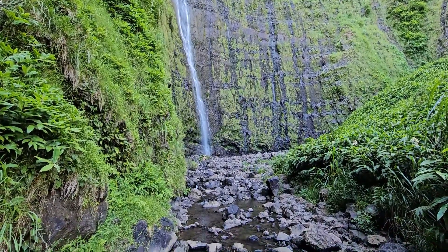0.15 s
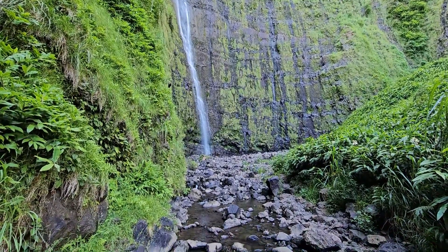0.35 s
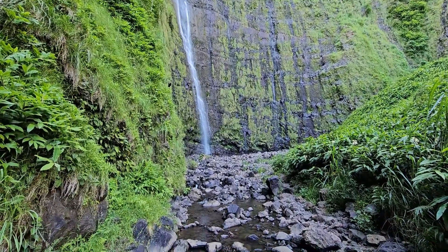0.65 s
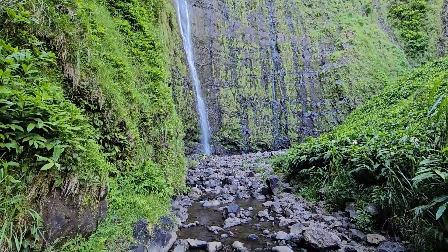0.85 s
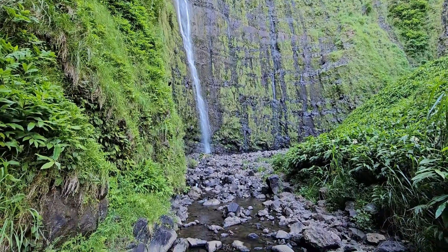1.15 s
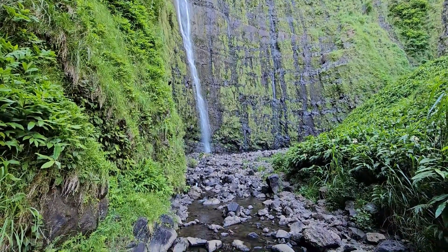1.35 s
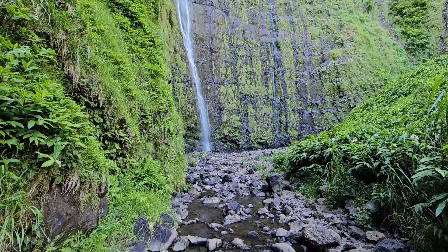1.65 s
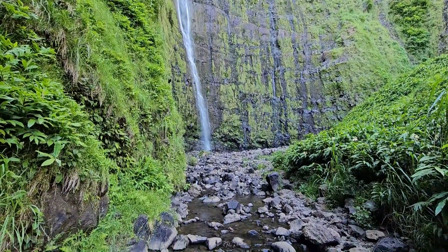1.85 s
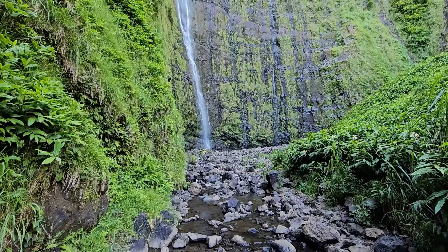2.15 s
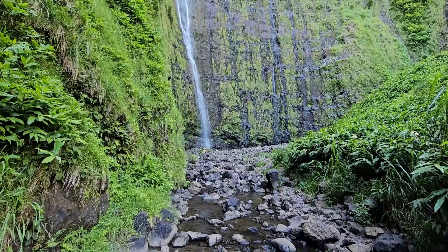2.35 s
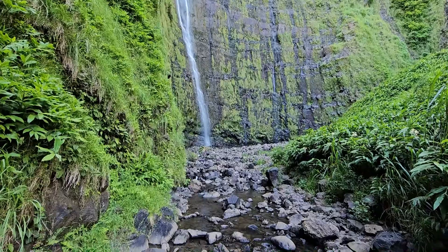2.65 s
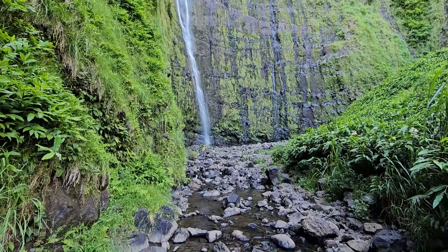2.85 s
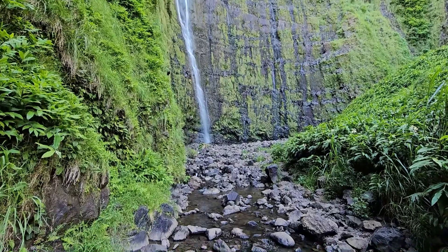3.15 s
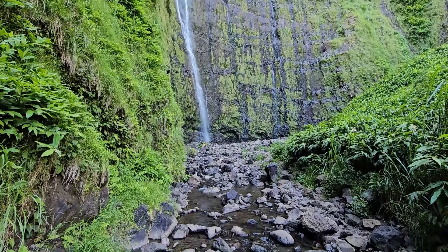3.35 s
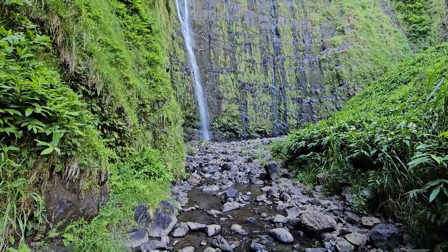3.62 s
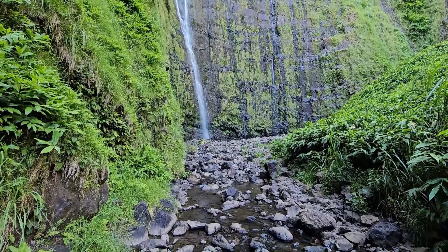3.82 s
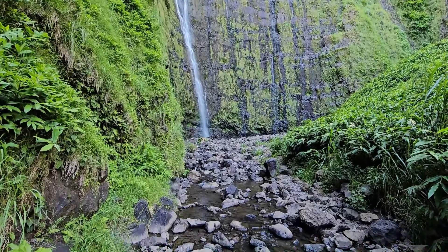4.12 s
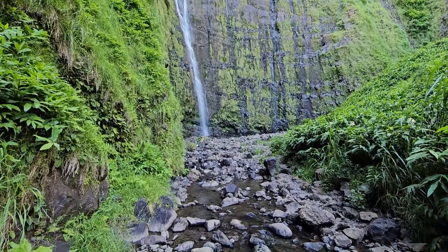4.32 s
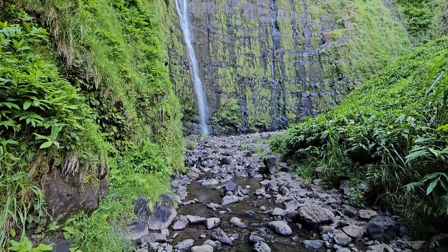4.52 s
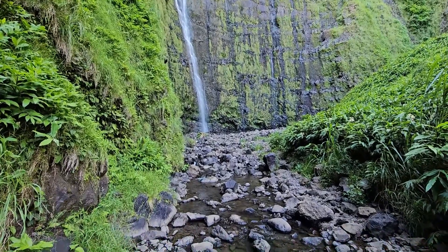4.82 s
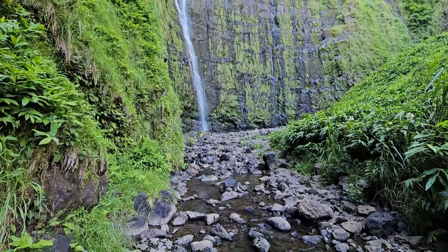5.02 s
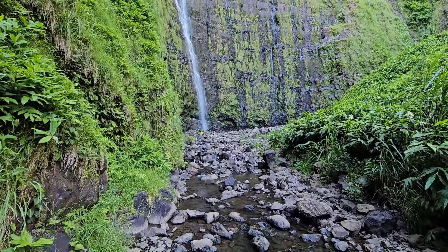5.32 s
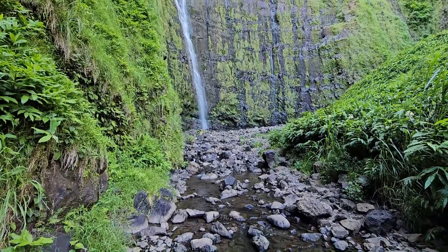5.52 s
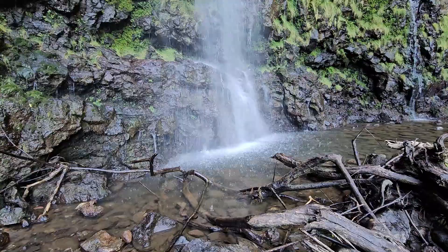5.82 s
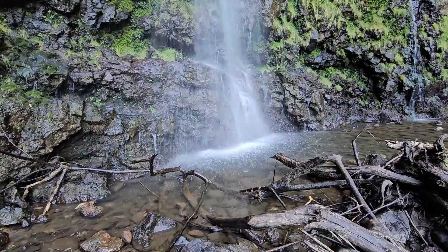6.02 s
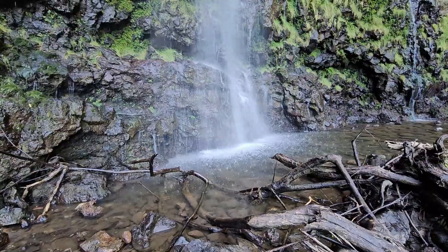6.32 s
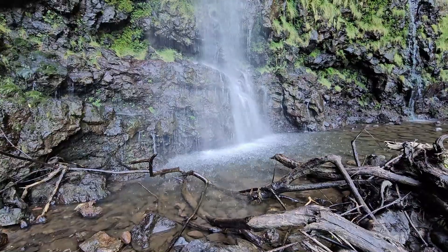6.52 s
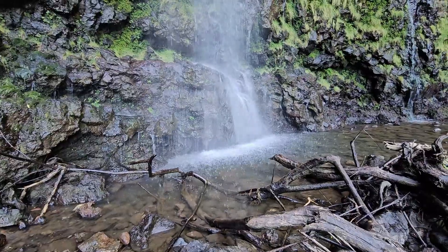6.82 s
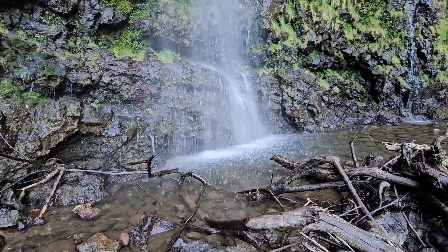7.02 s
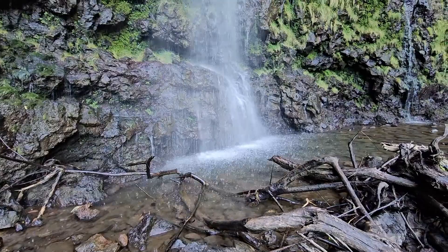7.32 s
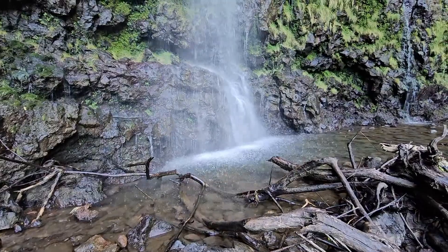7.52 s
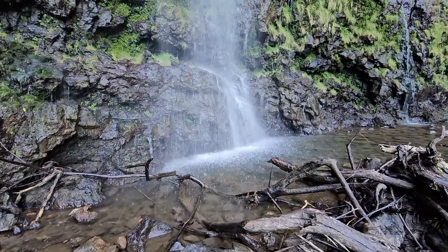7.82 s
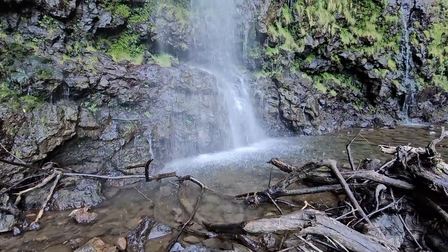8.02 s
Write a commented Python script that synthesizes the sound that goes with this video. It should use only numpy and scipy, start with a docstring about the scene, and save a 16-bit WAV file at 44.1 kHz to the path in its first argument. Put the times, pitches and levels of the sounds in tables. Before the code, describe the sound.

Two stereo views of falling water joined by a hard cut. The first is soft and midrange, a distant wash with fine splashes and small ringing bubbles close by, some low gulps, some high plinks. After a tiny gap, the second is dense, loud spray hitting a pool, slightly hollow from nearby rock, with deep wind buffeting strongest just after the cut.

```python
"""A tall waterfall in a rocky gorge, heard from two places with a brief silence between them.
First from downstream: a soft rush of filtered noise and tiny splashes, with a brook in front
that babbles and gulps among stones, made of ringing bubbles.
Then beside the plunge pool: a loud hiss of noise and spray drops with a rock echo,
while the fall's draught, low noise in one gust and brief puffs, rumbles on the microphone."""
import sys
import numpy as np
from scipy import signal
from scipy.fft import rfft, irfft
from scipy.io import wavfile

SR = 44100
rng = np.random.default_rng(int(sys.argv[2]) if len(sys.argv) > 2 else 0)


def master(y):
    """Save y as 16-bit WAV."""
    cut = np.clip(np.atleast_2d(y).T, -1, 1)
    pcm = np.round(cut * 32767)  # scale
    wavfile.write(sys.argv[1], SR, pcm.astype(np.int16))


N = 359856
LEAVE_S, ARRIVE_S = 5.726, 5.7945  # the brook ends, the pool begins
TIME = np.arange(N) / SR
FREQ = np.maximum(np.arange(N // 2 + 1) * SR / N, 1)  # in Hz, kept above zero for the logarithms
EARS = np.array([[1], [-1]])  # left, right


def from_db(db):
    """Turn decibels into gain."""
    return 10 ** (np.asarray(db) / 20)


def rms_one(x):
    """Scale to an rms (average strength) of 1."""
    return x / np.sqrt(np.mean(x ** 2) + 1e-20)


def in_time(rows):
    """Draw straight lines between (seconds, value) rows, one value per sample."""
    return np.interp(TIME, *np.transpose(rows))


def gain_at(points, hz=FREQ):
    """Read the gain from a (Hz, dB) table, on a log-frequency axis."""
    at, db = np.transpose(points)
    return from_db(np.interp(np.log(hz), np.log(at), db))


def drift(rate):
    """Slow random wander of rms 1 that changes about rate times a second."""
    spectrum = rfft(rng.standard_normal(N))
    return rms_one(irfft(spectrum / (1 + (FREQ / rate) ** 2), N))


def drops(per_s, spread_db):
    """Tiny impacts of uneven size, coming in flurries; two unrelated rows with a joint rms of 1."""
    flurries = from_db(2.2 * drift(12))
    born = rng.random((2, N)) < per_s * flurries / SR
    sizes = from_db(spread_db * np.minimum(rng.exponential(1, (2, N)), 4))
    signs = rng.choice([-1, 1], (2, N))
    return rms_one(born * sizes * signs)


def spread(pair, colour, width, balance):
    """Turn the spectra of the ears' sum and difference into left and right, with tone and balance."""
    mid, side = pair
    apart = gain_at(width)
    ears = (mid + EARS * side * apart) / np.hypot(1, apart)
    tilt = gain_at(balance) ** (EARS / 2)  # half of the balance to each ear
    return irfft(ears * gain_at(colour) * tilt, N) * np.sqrt(SR / 2)


def churn(water, low_hz, high_hz, depth_db, rate, count):
    """Neighbouring pitch ranges of the water noise swell and fade at random, each on its own."""
    spectrum, out = rfft(water), water
    step = np.log(high_hz / low_hz) / (count - 1)
    for hz in np.geomspace(low_hz, high_hz, count):
        triangle = np.clip(1 - abs(np.log(FREQ / hz)) / step, 0, 1)
        band = irfft(spectrum * triangle, N)
        out = out + band * (from_db(depth_db * drift(rate)) - 1)
    return out


# Tone of the pool's hiss, before spray and flicker. Each row: pitch in Hz, level in dB per Hz.
POOL_TONE = [(50, -84.5), (150, -76.5), (260, -72.5), (360, -77), (730, -65), (1020, -69.5), (1330, -58.5),
             (1630, -63.5), (1930, -59.5), (2750, -66), (5500, -65), (8000, -64.5), (12500, -69.5),
             (15700, -65.5)]
# How wide the pool sounds. Each row: pitch in Hz, difference of the ears against their sum in dB.
POOL_SPREAD = [(250, -16), (450, -6.5), (680, -14), (1020, -4.5), (1270, -6.5), (1950, -4.5), (2800, -0.5),
               (15000, 0.5)]
# Which ear is louder at the pool. Each row: pitch in Hz, left minus right in dB.
POOL_LEAN = [(100, 1), (1000, 1.2), (2000, 0.077), (3500, 3), (5500, 1.5), (7000, 0), (9500, 0),
             (13000, -1.3), (15500, -2)]


def plunge(spray_db=-8.0, flicker_db=0.65, echo_hz=620, echo_share=0.097, dull_hz=2700):
    """Countless drops hit the pool; a reflection off nearby rock adds a hollow comb of peaks."""
    hiss = rng.standard_normal((2, N))
    spray = from_db(spray_db) * drops(per_s=5000, spread_db=1.0)
    mid, side = rfft(hiss + spray)
    delayed = np.exp(-2j * np.pi * FREQ / echo_hz)  # late by 1 / echo_hz, so peaks lie echo_hz apart
    echo = 1 + echo_share * delayed / (1 + (FREQ / dull_hz) ** 6)
    flicker = from_db(flicker_db * drift(15))
    return flicker * spread((mid * echo, side), POOL_TONE, POOL_SPREAD, POOL_LEAN)


# Tone of the rush downstream, before splashes and flicker. Each row: pitch in Hz, level in dB per Hz.
STREAM_TONE = [(25, -105), (90, -90.5), (150, -90), (240, -77), (370, -80.5), (630, -74.5), (1000, -77),
               (2050, -73.5), (2600, -78.5), (3700, -76), (5300, -82), (8000, -79), (10000, -85),
               (15700, -91)]
# How wide the rush sounds. Each row: pitch in Hz, difference of the ears against their sum in dB.
STREAM_SPREAD = [(50, -11), (220, -20), (440, -8.5), (670, -9.5), (1000, -3), (1350, 0), (15000, 0.5)]
# Which ear is louder downstream. Each row: pitch in Hz, left minus right in dB.
STREAM_LEAN = [(100, 1), (1000, 1), (2000, -0.1), (3200, 2.5), (5500, 0), (8500, 2.5), (10500, -1),
               (13000, 1.5), (15500, .5)]


def stream(splash_db=-8.0, flicker_db=0.47, left_lead_s=.00009, splash_hz=2000):
    """The far fall and the riffles merge into a rush; nearer splashes, a little left, prickle in its treble."""
    rush = rfft(rng.standard_normal((2, N)))
    treble = FREQ / np.hypot(FREQ, splash_hz)  # weakens what lies below splash_hz
    splashes = from_db(splash_db) * rfft(drops(per_s=1200, spread_db=3.5)[0]) * treble
    half_lead = np.pi * FREQ * left_lead_s  # half the lead of the left ear, as a phase in radians
    lead_pair = np.array([np.cos(half_lead), 1j * np.sin(half_lead)])
    direct = np.sqrt(2) * splashes * lead_pair
    flicker = from_db(flicker_db * drift(25))
    return flicker * spread(rush + direct, STREAM_TONE, STREAM_SPREAD, STREAM_LEAN)


def bubble(hz, cycles, rise, swell):
    """A trapped air pocket swells, rings for some cycles and climbs in pitch as it nears the surface."""
    age = np.linspace(0, 1, int(cycles / hz * SR) + 2)  # 0 at birth, 1 at the end
    fade = np.exp(-np.log(1000) * age)  # falls by 60 dB
    envelope = fade * (1 - np.exp(-age / swell)) ** 2
    turns = cycles * (age + rise * age ** 2 / 2)
    return envelope / envelope.max() * np.sin(2 * np.pi * turns)


def add(out, sound, s, bearing):
    """Place a sound to the left (positive bearing) or right: the nearer ear gets it sooner and louder."""
    for ear, sign in enumerate((1, -1)):
        start = max(int((s - sign * bearing * 0.00024) * SR), 0)
        part = out[ear, start:start + len(sound)]
        part += from_db(sign * bearing * 2.3) * sound[:len(part)]


def babble(slosh, low_hz, high_hz, level_db, spread_db, cycles, count):
    """Bubbles of many sizes form across the brook, most of them faint, more often as the water sloshes."""
    out, chance = np.zeros((2, N)), rng.random((count, 5))
    times = np.interp(chance[:, 0], np.cumsum(slosh) / slosh.sum(), TIME)
    for s, (pitch, size, place, life) in zip(times, chance[:, 1:]):
        hz = low_hz * (high_hz / low_hz) ** pitch
        ring = bubble(hz, cycles * (.5 + life), rise=0.09, swell=0.15)
        strength = min(-np.log(1 - size), 3)  # many small values, few large
        add(out, from_db(level_db + spread_db * strength) * ring, s, 1.54 * place - .5)
    return out


# Loud bubbles between the stones, low and high.
# Each row: start in seconds, peak level in dB before the trim and placing, starting pitch in Hz.
LOUD_BUBBLES = [(1.289, -42, 273), (2.563, -35.5, 1134), (3.16, -37, 960), (3.334, -34.5, 1035),
                (4.141, -29, 1888), (4.302, -36.5, 299), (4.34, -41, 369), (5.368, -35, 1570),
                (5.436, -31, 1840), (5.545, -32.5, 304), (5.707, -36.5, 573)]


def gulps(level_db=-.5, cycles_at_1khz=22):
    """The loudest bubbles stand out singly; the small high ones ring for more cycles."""
    out = np.zeros((2, N))
    for s, db, hz in LOUD_BUBBLES:
        cycles = cycles_at_1khz * np.sqrt(hz / 1e3)
        ring = bubble(hz, cycles, rise=0.045, swell=0.14)
        add(out, from_db(db + level_db) * ring, s, (rng.random() - .5) / 2)
    return out


# Strength of the draught, one gust that eases off. Each row: time in seconds, level in dB before the trim.
GUST = [(5.82, -58), (6.12, -40), (6.72, -52.5), (7.5, -52), (8.03, -63)]
# Tone of moving air on the microphone. Each row: pitch in Hz, relative level in dB per Hz.
RUMBLE_TONE = [(15, -16), (40, 1), (65, -5), (100, -11), (160, -36), (400, -40)]
# Single puffs that thump the microphone. Each row: time of the crest in seconds, level in dB.
THUMPS = [(5.965, -43), (6.19, -37), (6.36, -40.5), (6.58, -44), (7.11, -46), (7.56, -44), (7.79, -41.5)]
PUFF_RISE_S, PUFF_FALL_S = 0.016, 0.021  # spreads of the two bell-shaped sides


def draught(level_db=-1.5, puff_db=0.0, apart_db=-13.0):
    """Air dragged down by the fall swells and dies away on the microphone, with puffs; ears nearly alike."""
    noise = rfft(rng.standard_normal((2, N)))
    mid, side = rms_one(irfft(noise * gain_at(RUMBLE_TONE), N))
    power = from_db(in_time(GUST) + level_db) ** 2
    for s, db in THUMPS:
        age = TIME - s
        swell = np.exp(-.5 * (age / np.where(age < 0, PUFF_RISE_S, PUFF_FALL_S)) ** 2)
        power = power + (from_db(db + puff_db) * swell) ** 2
    return np.sqrt(power) * (mid + EARS * from_db(apart_db) * side)


def scene():
    """The brook, a brief silence, then the foot of the fall."""
    pool = churn(plunge(), low_hz=800, high_hz=2390, depth_db=1.0, rate=22, count=4)
    rush = churn(stream(), low_hz=553, high_hz=2820, depth_db=1.4, rate=24, count=7)
    slosh = from_db(3 * drift(8)) * (TIME < LEAVE_S)
    tinkle = babble(slosh, low_hz=993, high_hz=4590, level_db=-49.0, spread_db=2.0, cycles=24, count=1400)
    burble = babble(slosh, low_hz=490, high_hz=1080, level_db=-52.5, spread_db=1.0, cycles=15.4, count=550)
    gurgle = babble(slosh, low_hz=207.6, high_hz=279, level_db=-54, spread_db=1.0, cycles=16.0, count=110)
    downstream = rush + tinkle + burble + gurgle + gulps()
    beside_pool = pool + draught()
    return downstream * (TIME < LEAVE_S) + beside_pool * (TIME > ARRIVE_S)


# Narrow resonances of the microphone ports.
# Each row: centre in Hz, width in Hz, left boost or cut in dB, right boost or cut in dB.
PORT_RESONANCES = [(7300, 500, 1.5, 3.0), (9350, 400, 1.5, 2.0), (10250, 600, -3.0, 0),
                   (10750, 400, -2.5, -2.0), (11530, 500, 3.0, 4.0), (14450, 600, 0.3, 3.3)]
CUTOFF_HZ = 15780


def record(dry):
    """The microphone ports colour the treble of each ear, and a steep filter cuts the top."""
    colour_db = 0
    for hz, width, left, right in PORT_RESONANCES:
        colour_db = colour_db + np.array([[left], [right]]) / (1 + (2 * (FREQ - hz) / width) ** 2)
    coloured = irfft(rfft(dry) * from_db(colour_db), N)
    top_cut = signal.ellip(12, .1, 80, CUTOFF_HZ, fs=SR, output="sos")
    return signal.sosfilt(top_cut, coloured)


dry = scene()
out = record(dry)
master(out)
```